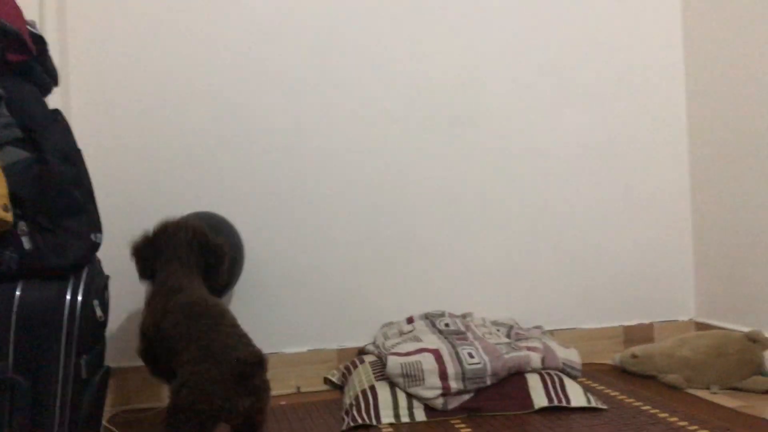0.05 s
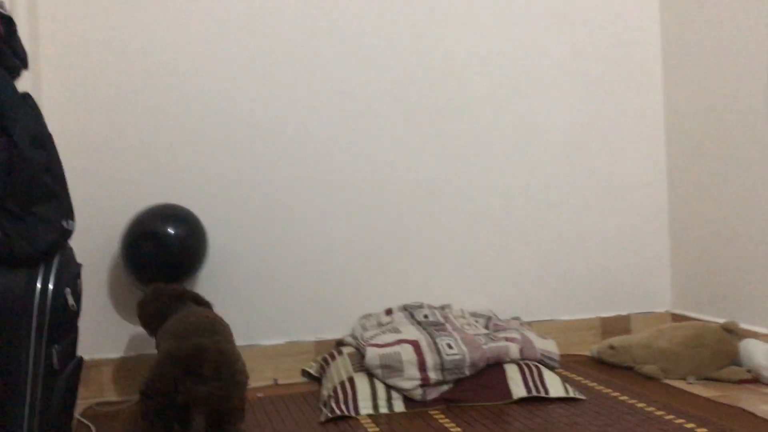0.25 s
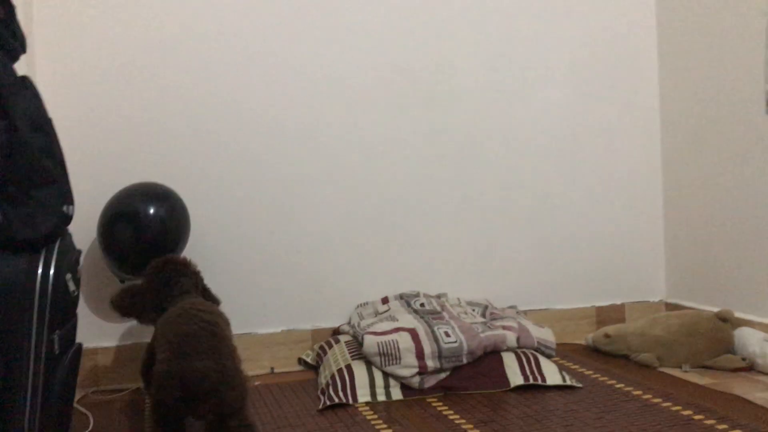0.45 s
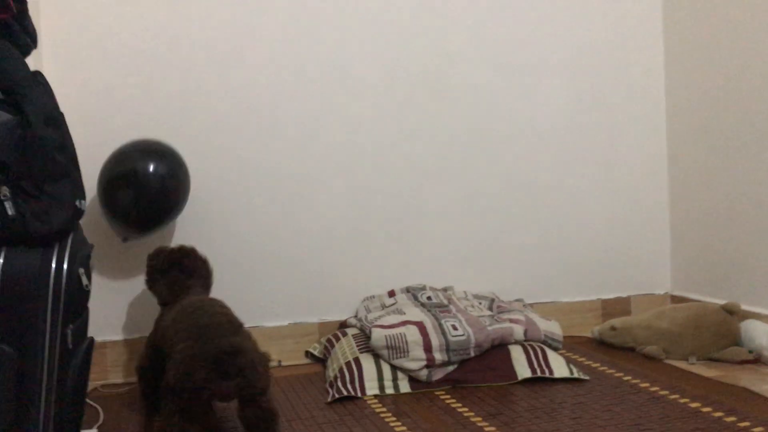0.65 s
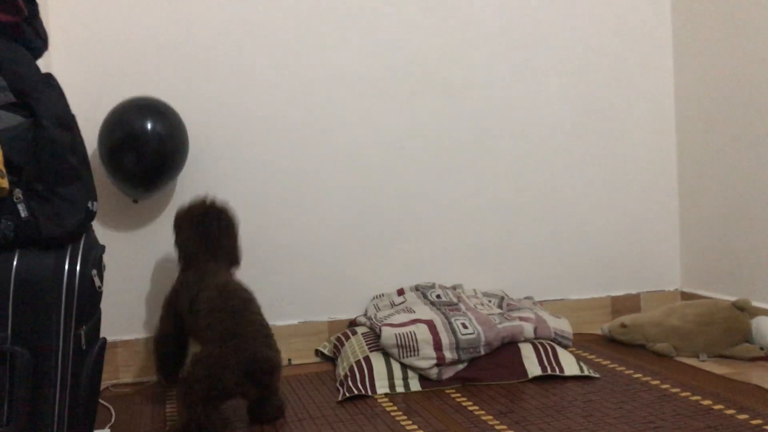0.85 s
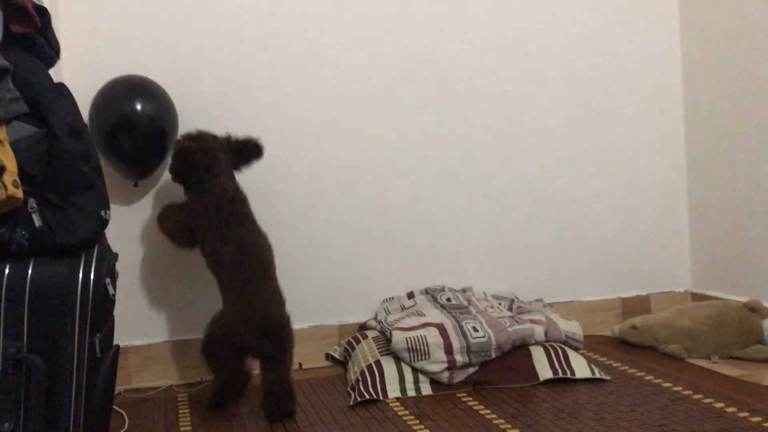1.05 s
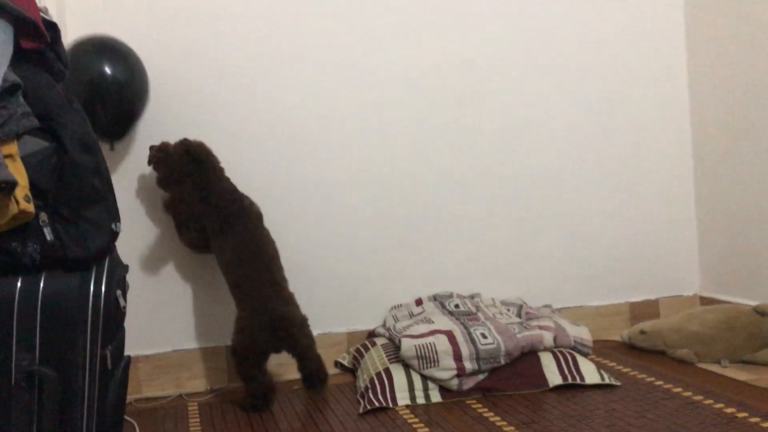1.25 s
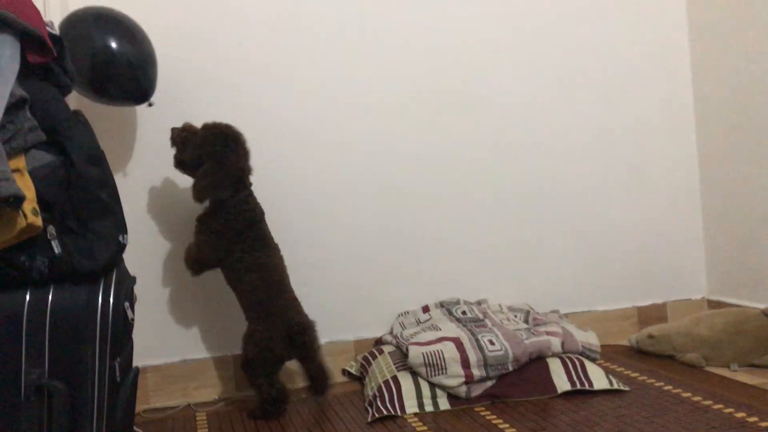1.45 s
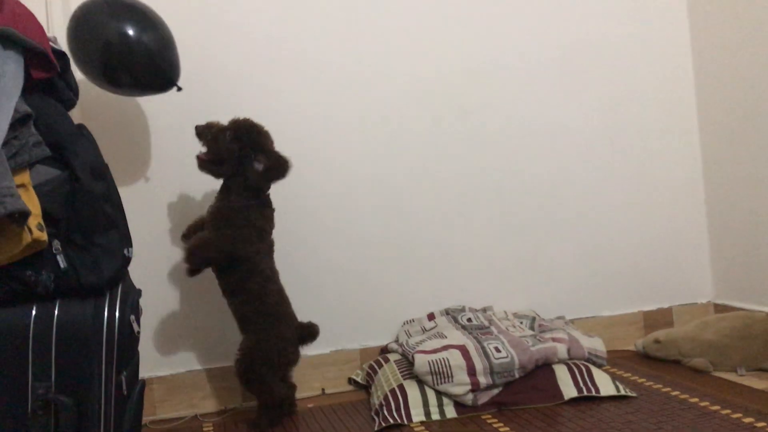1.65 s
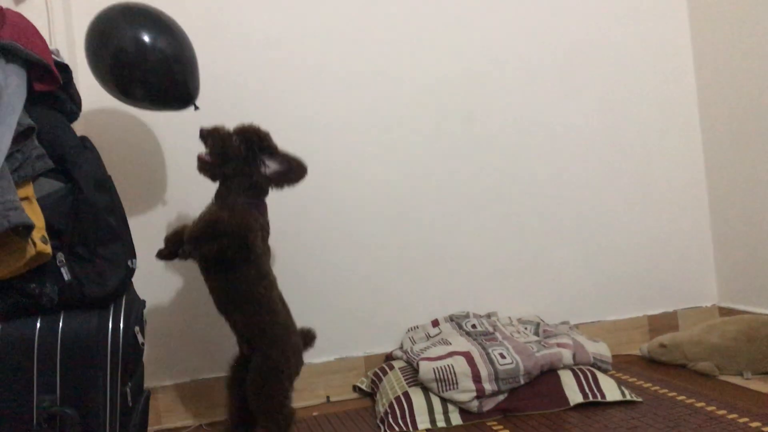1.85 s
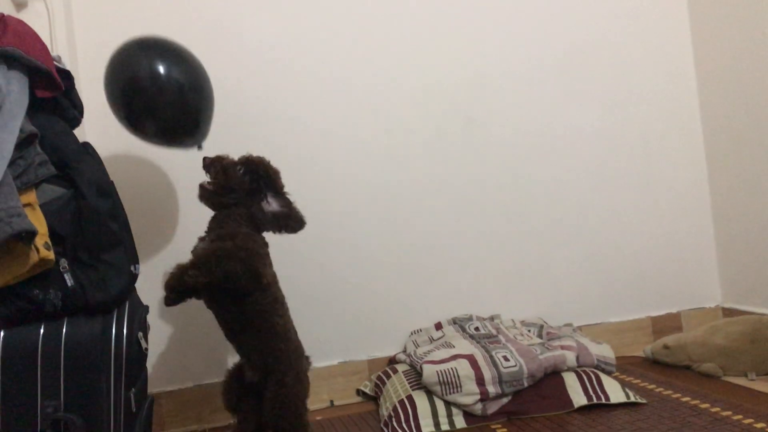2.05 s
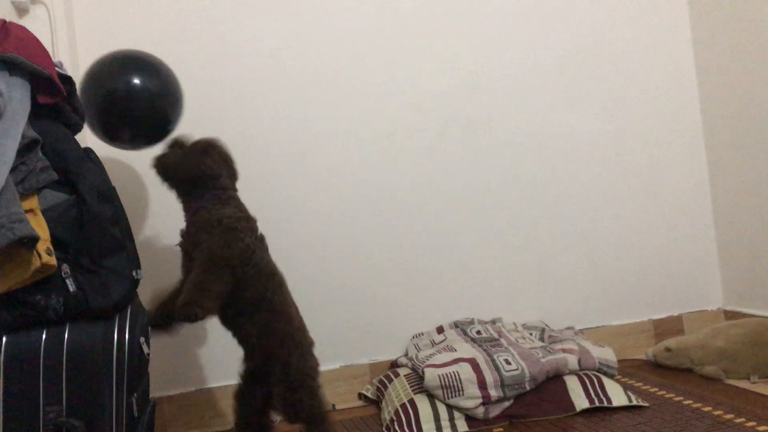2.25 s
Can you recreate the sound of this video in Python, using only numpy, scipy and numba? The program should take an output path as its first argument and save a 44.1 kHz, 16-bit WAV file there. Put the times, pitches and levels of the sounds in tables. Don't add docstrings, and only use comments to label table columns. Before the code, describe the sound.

A small dog yaps three times, high and raspy, with short whines and a small squeak between, then paws scuff and claws tick on a mat; bare hard-walled room, phone a few metres away.

```python
import sys
import numpy as np
from scipy import signal
from scipy.io import wavfile
from scipy.ndimage import uniform_filter1d
from numba import njit

SR = 44100
rng = np.random.default_rng(int(sys.argv[2]) if len(sys.argv) > 2 else 0)


def linear_from_db(decibels):
    return 10 ** (np.asarray(decibels, float) / 20)


def dump(signal):
    limited = np.clip(np.atleast_2d(signal).T, -1, 1)
    pcm = np.round(limited * 32767).astype(np.int16)
    wavfile.write(sys.argv[1], SR, pcm)


N = 101429


def curve(x, pts, col=1):
    return np.interp(x, [p[0] for p in pts], [p[col] for p in pts])


def colour(hz, pts):
    return np.interp(np.log(hz), np.log([p[0] for p in pts]), [p[1] for p in pts])


def unit(x):
    return x / np.sqrt(np.mean(x ** 2))


def band(x, lo_hz, hi_hz):
    sos = signal.butter(2, [lo_hz, min(hi_hz, SR / 2.2)], "band", fs=SR, output="sos")
    return signal.sosfilt(sos, x)


def walk(rate_hz, n=N):
    k = max(int(SR / rate_hz), 1)
    return unit(uniform_filter1d(uniform_filter1d(rng.standard_normal(n), k), k))


# (frequency [Hz], gain [dB])
MOUTH_SHUT = [(550, -63.5), (800, -10.5), (1100, 1), (1700, -18), (2300, -19), (3300, -19.5), (4300, -43),
              (6800, -31)]
# (frequency [Hz], gain [dB])
MOUTH_OPEN = [(550, -47), (800, -26), (1100, -11.5), (1650, 4.5), (2250, 1), (3300, -11), (4300, -31.5),
              (6800, -25)]


def throat(hz, mouth):
    top_db = -15.5 * np.maximum(np.log2(hz / MOUTH_OPEN[-1][0]), 0)
    shut_db, open_db = colour(hz, MOUTH_SHUT), colour(hz, MOUTH_OPEN)
    return linear_from_db((1 - mouth) * shut_db + mouth * open_db + top_db)


EFFORT_DB_PER_DB = 0.117


def fold_tones(hz, db, rough, mouth, phase):
    n, voice = len(hz), 0
    for half in range(1, 25):
        at = hz * half / 2
        if half == 2:
            at = np.maximum(hz, 959)
        if half % 2 == 0:
            share = 1 - 0.424 * rough
        else:
            half_db = 4 - min(half - 3, 4) - 5.5 * (half > 7)
            share = linear_from_db(half_db) * 1.036 * rough ** 2
        effort_db = EFFORT_DB_PER_DB * (db + 6) * (at > 4000)
        shimmer_db = 4.5 * rough * walk(80, n)
        clean_db = -10 * (1 - rough) * (half > 7)
        hollow_db = -1 * (2 - rough) * np.exp(-((at - 3750) / 380) ** 2)
        level = linear_from_db(effort_db + shimmer_db + clean_db + hollow_db)
        voice = voice + share * throat(at, mouth) * level * np.sin(phase * half / 2 + half ** 2)
    return voice


def breath_rasp(hz, db, rough, mouth, phase):
    n, rasp = len(hz), 0
    puff = (1 + 0.902 * np.cos(phase / 2)) * rng.standard_normal(n)
    spiky = puff * linear_from_db(3 * walk(500, n))
    for c in 630 * 2 ** (np.arange(14) / 3):
        breath = spiky if c > 4000 else puff
        under_db = 12 * np.minimum(np.log2(c / hz), 0)
        effort_db = EFFORT_DB_PER_DB * (db + 9.5) * (c > 4000)
        level = linear_from_db(-10.5 + under_db + effort_db + 2.5 * walk(67, n))
        third = unit(band(band(breath, c / 1.1383, c * 1.1562), c / 1.1428, c * 1.0976))
        rasp = rasp + level * rough * np.sqrt(c / 1000) * throat(c, mouth) * third
    return rasp


def call(rows):
    t = np.arange(N) / SR
    on = (t > rows[0][0] - .02) & (t < rows[-1][0] + .02)
    hz, db, rough, mouth = (curve(t[on], rows, c) for c in range(1, 5))
    rough, mouth = np.clip(rough, 0, 1), np.clip(mouth, 0, 1)
    n = on.sum()
    hz = hz * (1 + .036 * rough ** 2 * walk(236.6, n))
    phase = 2 * np.pi * np.cumsum(hz) / SR
    voice = fold_tones(hz, db, rough, mouth, phase) + breath_rasp(hz, db, rough, mouth, phase)
    out = np.zeros(N)
    out[on] = voice * linear_from_db(db) * np.sqrt(np.sqrt(np.hanning(n)))
    return out


# (time [s], depth [dB], width [s])
FOLD_CATCHES = [(0.2664, -6, 0.00257), (0.2852, -18, 0.00112), (.342, -2, 0.00276), (0.3522, -11.5, 0.0021),
                (0.639, -5, 0.0017), (1.268, -26, 0.00146), (1.292, -4.5, 0.00214), (1.304, -1, 0.00205),
                (1.329, -2.5, 0.0025)]


def catches():
    t = np.arange(N) / SR
    return linear_from_db(sum(db * np.exp(-((t - s) / width) ** 2) for s, db, width in FOLD_CATCHES))


# (time [s], pitch [Hz], level [dB], roughness [0-1], mouth opening [0-1])
FIRST_YAP = [
    (.2, 598.1, -59, 0.09, 0.14),
    (.217, 636.1, -22.5, 0.08, 0.17),
    (.23, 841.9, -10.5, 0.54, 0.5),
    (.238, 1087, -14.5, 0.33, 0.32),
    (.258, 1109, -1.5, 0.28, 0.18),
    (.272, 1092, -4.5, 0.77, 0.47),
    (.294, 946.8, -6.5, 0.82, 0.09),
    (.327, 929.9, -4.5, 0.86, 0.12),
    (.39, 955.6, -29.5, 1, 0.8),
]
# (time [s], pitch [Hz], level [dB], roughness [0-1], mouth [0-1])
FIRST_HOLD = [(0.287, 1488, -29, 0.59, 0.42), (.297, 1477, -5.5, 0.67, 0.52),
              (.315, 1396, -18.5, 0.73, 0.14), (0.333, 1260, -5, 0.35, 0.36), (0.361, 1244, -2, 0.25, 0.31),
              (.385, 1262, -18, 0.39, 0.44), (.43, 1247, -42.5, 0.49, 0.85)]
# (time [s], pitch [Hz], level [dB], roughness [0-1], mouth [0-1])
SECOND_LEAD = [(.5, 776.3, -38.5, 0.34, 0.93), (0.536, 848.9, -19.5, 0.34, 0.45),
               (0.554, 899.9, -20.5, 0.38, 1), (0.573, 880.8, -24.5, 0.18, 0.98)]
# (time [s], pitch [Hz], level [dB], roughness [0-1], mouth opening [0-1])
SECOND_YAP = [(.535, 1003, -28.5, 0.165, 0.049), (0.554, 1040, -24, 0.207, .05),
              (0.563, 1067, -6.5, 0.1765, 0.028), (.582, 1094, -4.5, 0.306, 0.293),
              (.592, 998.3, -9, 1, 0.15), (0.603, 1085, -6.5, 0.786, 0.455), (0.63, 1085, -7, 0.695, 0.441),
              (0.646, 1095, -16, 0.7, 0.754), (.78, 1081, -28, 0.738, 0.5756)]
# (time [s], pitch [Hz], level [dB], roughness [0-1], mouth [0-1])
SECOND_HOLD = [(.62, 989.5, -18, 0.344, 0.066), (0.639, 981.2, -11, 0.708, 0.112),
               (0.719, 980.8, -22, 0.885, 0.029), (.85, 943.3, -37, 0.467, 0.015),
               (0.901, 952.6, -47.5, .2, 0.02), (1.06, 938.5, -45, .2, 0.0019)]
# (time [s], pitch [Hz], level [dB], roughness [0-1], mouth opening [0-1])
SMALL_SQUEAK = [
    (.85, 690.1, -35.5, 0.374, 0.387),
    (0.869, 754.9, -28, 0.306, 0.416),
    (0.884, 777.6, -27, 0.294, 0.76),
    (0.905, 753.9, -36, 0.577, 0.637),
    (0.981, 735.3, -37.5, 0.33, 0.36),
]
# (time [s], pitch [Hz], level [dB], roughness [0-1], mouth [0-1])
THIRD_LEAD = [(1.199, 937.8, -47.5, 0.067, 0.487), (1.211, 940.9, -26, 0.16, 0.695),
              (1.227, 924.6, -21, 0.457, 0.668), (1.25, 902.4, -21.5, 0.698, 0.9),
              (1.266, 867, -39, 0.61, 0.78)]
# (time [s], pitch [Hz], level [dB], roughness [0-1], mouth opening [0-1])
THIRD_YAP = [(1.228, 1062, -56.5, .2, .1), (1.242, 1086, -5, 0.22, 0.175), (1.26, 1117, -4.5, 0.107, 0.147),
             (1.276, 1110, -1, 0.3, 0.58), (1.292, 1068, -8.5, 0.899, 0.517),
             (1.335, 1089, -17.5, 0.818, 0.464), (1.375, 949.8, -15, 0.893, 0.35),
             (1.41, 834.7, -19.5, 0.636, 0.146), (1.499, 687.4, -36.5, 0.776, 0.373)]
# (time [s], pitch [Hz], level [dB], roughness [0-1], mouth [0-1])
THIRD_HOLD = [(1.295, 1110, -30, .05, 1), (1.31, 1110, -16, .04, 1), (1.35, 1108, -15, .04, 1),
              (1.365, 1100, -28, .15, 1), (1.42, 1105, -38, .2, 1)]


def dog():
    calls = (FIRST_YAP, FIRST_HOLD, SECOND_LEAD, SECOND_YAP, SECOND_HOLD,
             SMALL_SQUEAK, THIRD_LEAD, THIRD_YAP, THIRD_HOLD)
    drive_db = 9.5
    return linear_from_db(drive_db) * catches() * sum(call(rows) for rows in calls)


# (time [s], level [dB], rise [s], fall [s], lowest frequency [Hz])
PAW_SCUFFS = [(.197, -37.5, .001, 0.049, 5530), (.46, -53, 0.0078, 0.0256, 9000),
              (1.746, -39, 0.0089, 0.02026, 9700), (1.809, -41.5, 0.0104, 0.0323, 7100),
              (1.902, -56.5, 0.03276, 0.053, 1156), (1.972, -34.5, 0.0172, 0.043, 3915),
              (2.295, -42.5, 0.0173, 0.031, 3444)]


def scuffs():
    t, out = np.arange(N) / SR, np.zeros(N)
    for s, db, rise, fall, lo_hz in PAW_SCUFFS:
        grit = rng.standard_normal(N) * linear_from_db(2.0 * walk(980))
        swell = np.exp(np.minimum((t - s) / rise, (s - t) / fall))
        out += linear_from_db(db) * swell * unit(band(grit, lo_hz, 18270))
    return out


# (time [s], peak level [dB])
CLAW_CLICKS = [(0.195, -32), (0.8704, -51), (1.732, -37), (1.7969, -49.5), (1.953, -38), (1.9658, -16.5),
               (2.2657, -42.5), (2.2817, -35), (2.2914, -72)]


def claws():
    ticks = np.zeros(N)
    for s, db in CLAW_CLICKS:
        ticks[int(s * SR)] = linear_from_db(db + 8)
    rings = sum(band(ticks, hz / 1.03, hz * 1.03) for hz in (5616, 6634))
    return band(ticks, 2980, 15800) + linear_from_db(11.5) * rings


TAG_MODES = 4450, 6650, 10300, 13550, 14800, 2220
# (time [s], level [dB],
# ring mode [index], t60 [s])
TAG_STROKES = [(.55, -45, 4, .45), (.62, -55, 4, .22), (1.4, -34, 5, .8), (1.09, -47, 0, .15),
               (1.12, -56, 4, .3), (1.12, -57, 2, .3), (1.12, -62, 3, .3), (1.32, -31, 1, .45),
               (1.53, -60, 4, .6), (1.53, -60, 2, .6), (1.685, -56, 4, .3), (1.685, -59, 2, .3),
               (2.22, -58, 4, .4), (2.22, -62, 3, .3)]


def tag():
    t, flutter_db, out = np.arange(N) / SR, 6.6 * walk(71.9), 0
    for s, db, mode, t60 in TAG_STROKES:
        fade_db = 60 * np.abs(t - s) / np.where(t > s, t60, .01)
        out = out + linear_from_db(db + flutter_db - fade_db) * np.sin(2 * np.pi * TAG_MODES[mode] * t)
    return out


def room(x):
    t60_low_s, t60_high_s, t60_hall_s = 0.2796, 0.3436, 1.026
    room_db, hall_db, first_echo_s = -8, -17.5, 0.0082
    t = np.arange(SR) / SR
    echoes = rng.standard_normal(SR) * linear_from_db(5.03 * rng.standard_normal(SR)) * (t > first_echo_s)
    low_fade = linear_from_db(-60 * t / t60_low_s) + linear_from_db(hall_db - 60 * t / t60_hall_s)
    high_fade = linear_from_db(-60 * t / t60_high_s)
    tail = band(echoes, 76, 4155) * low_fade + band(echoes, 2175, 27000) * high_fade
    tail = tail / np.sqrt(np.sum(tail ** 2))
    return x + linear_from_db(room_db) * signal.fftconvolve(x, tail)[:N]


# (frequency [Hz], density [dB per Hz])
AIR_COLOUR = [(45, 0), (100, -5.5), (300, -14.5), (500, -19), (1000, -15), (2500, -20.5), (5000, -31.5),
              (15500, -43)]


def air():
    tone = 0
    for c in 45 * 2 ** (np.arange(18) / 2):
        noise = rng.standard_normal(N)
        half_octave = unit(band(band(noise, c / 1.348, c * 1.2055), c / 1.133, c * 1.192))
        tone = tone + linear_from_db(colour(c, AIR_COLOUR) + 0.304 * walk(35)) * np.sqrt(c) * half_octave
    return linear_from_db(-45) * unit(tone)


# (time [s], level [dB])
FLOOR_RUMBLE = [(0, -36.5), (.35, -43.5), (.6, -55.5), (1.1, -49), (1.14, -42), (1.5, -51), (1.92, -43),
                (1.97, -37), (2.3, -43.5)]


def floor():
    t = np.arange(N) / SR
    rumble_db = curve(t, FLOOR_RUMBLE)
    hum_hz = 59 * (1 + 0.01713 * walk(7.8))
    hum_db = -34 + 0.737 * (rumble_db - FLOOR_RUMBLE[0][1]) + 2.0 * walk(24)
    hum = linear_from_db(hum_db) * np.sin(2 * np.pi * np.cumsum(hum_hz) / SR)
    deep = band(rng.standard_normal(N), 73.2, 94.6)
    upper = band(rng.standard_normal(N), 109.2, 219.5)
    return hum + linear_from_db(rumble_db) * unit(deep + 0.3404 * upper)


def scene():
    return (room(dog() + tag()) + scuffs() + claws() + air() + floor())[None]


@njit
def duck(x, top, ratio, grab, let_go):
    y, e = np.empty(len(x)), 0.
    for i in range(len(x)):
        a = abs(x[i])
        e += (a - e) * (grab if a > e else let_go)
        y[i] = x[i] * min(1., (top / (e + 1e-9)) ** (1 - 1 / ratio))
    return y


def roll_off(x):
    return signal.sosfilt(signal.butter(12, 16410, fs=SR, output="sos"), x)


def record(dry):
    mic_lo_hz, mic_hi_hz = 45, 15900
    grab_s, let_go_s = 0.0126, .5
    clip, knee = .72, 6
    x = band(band(dry[0], mic_lo_hz, mic_hi_hz), mic_lo_hz, mic_hi_hz)
    x = duck(x, 0.1457, 1.9422, 1 / (grab_s * SR), 1 / (let_go_s * SR))
    x = x / (1 + np.abs(x / clip) ** knee) ** (1 / knee)
    x = signal.sosfilt(signal.ellip(8, .2, 70, mic_hi_hz, fs=SR, output="sos"), x)
    return roll_off(x[None])


dry = scene()
out = record(dry)
dump(out)
```